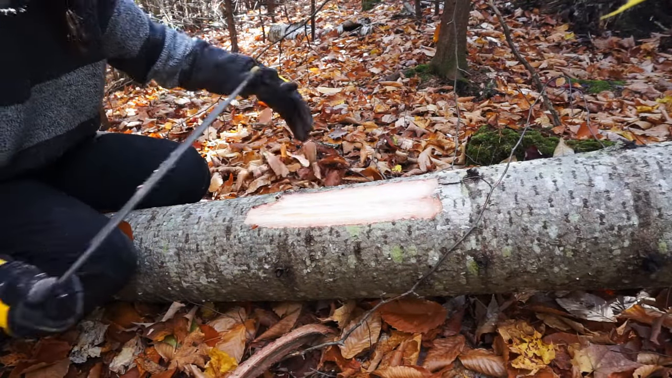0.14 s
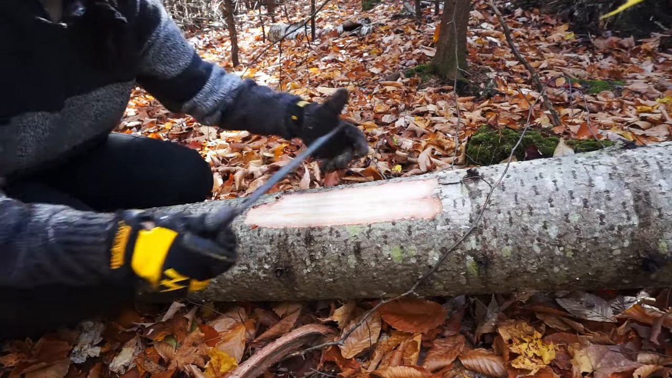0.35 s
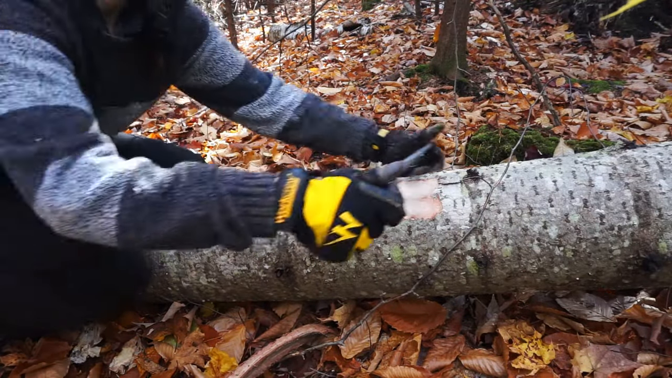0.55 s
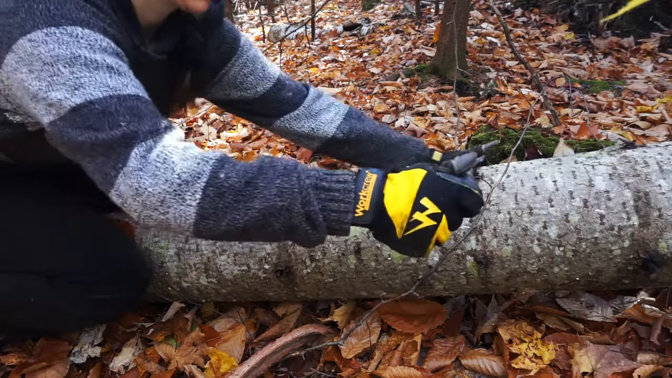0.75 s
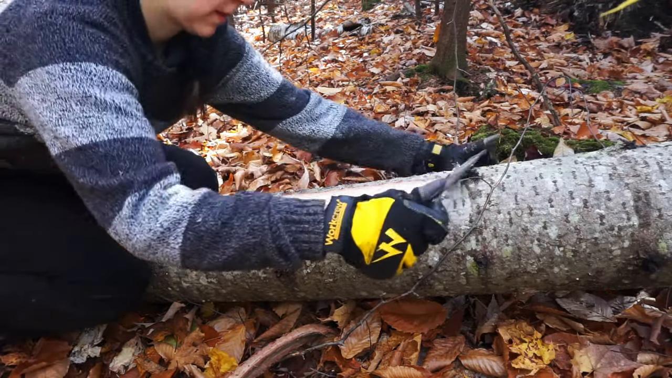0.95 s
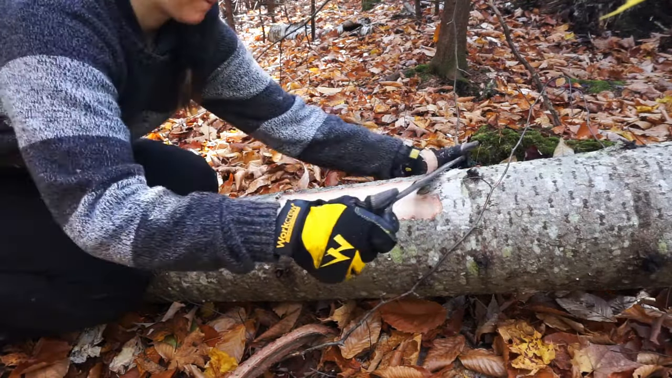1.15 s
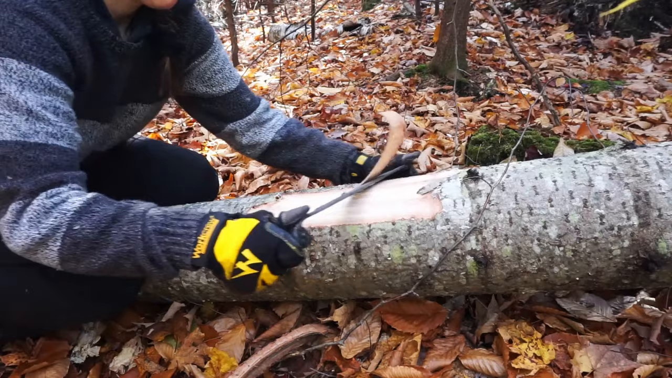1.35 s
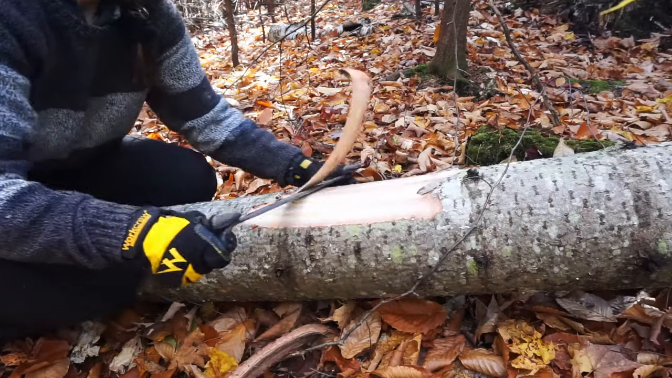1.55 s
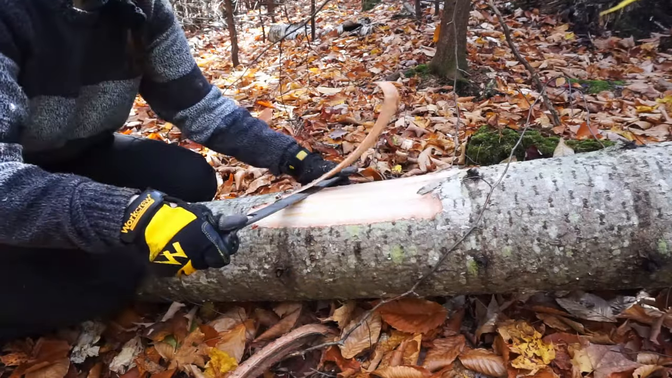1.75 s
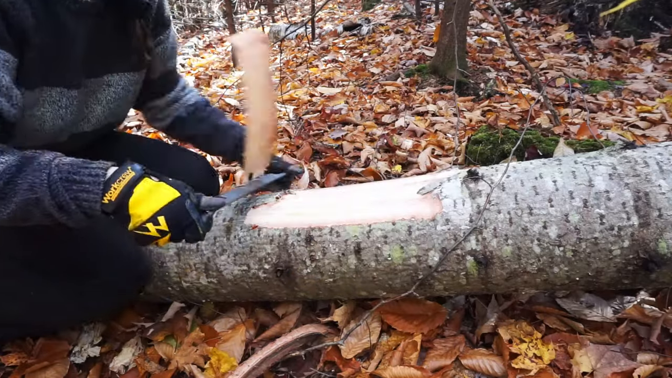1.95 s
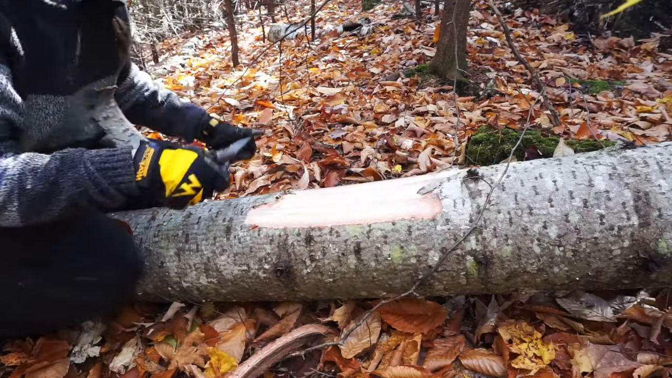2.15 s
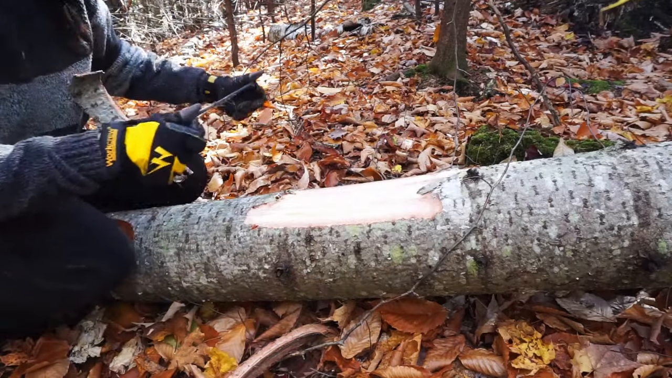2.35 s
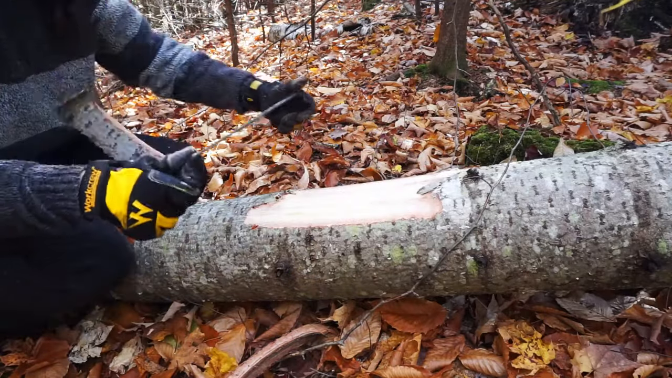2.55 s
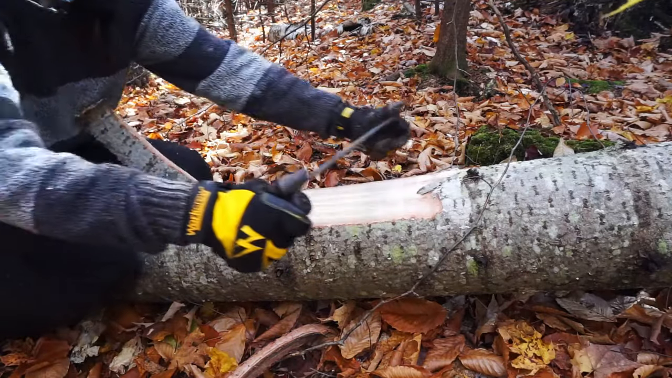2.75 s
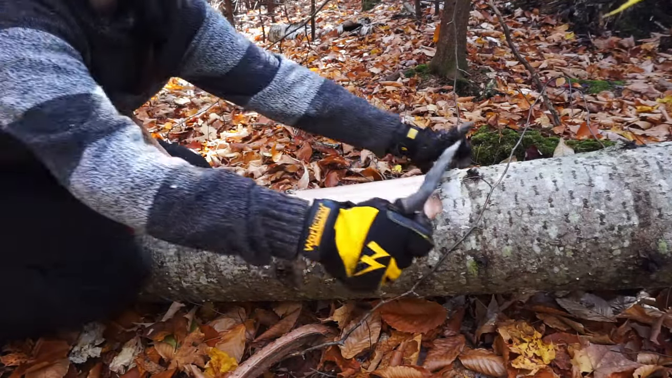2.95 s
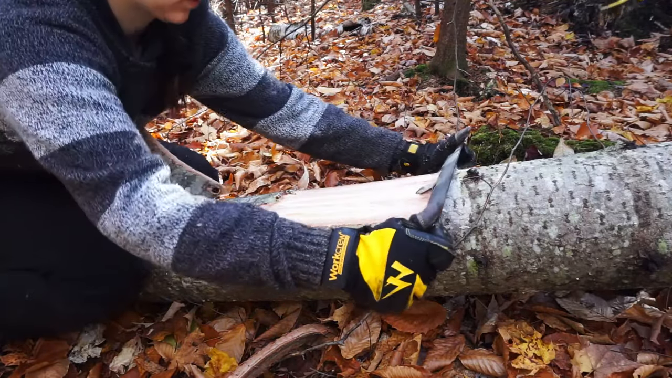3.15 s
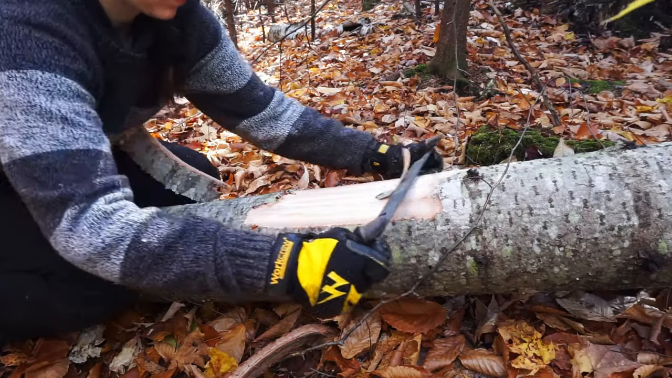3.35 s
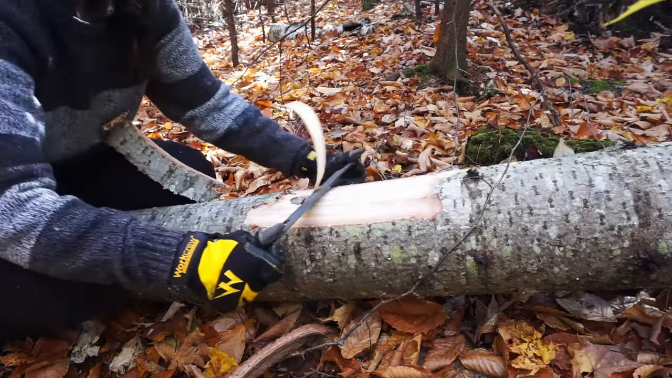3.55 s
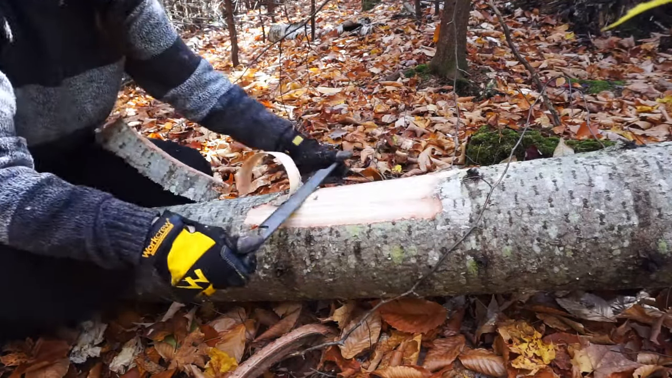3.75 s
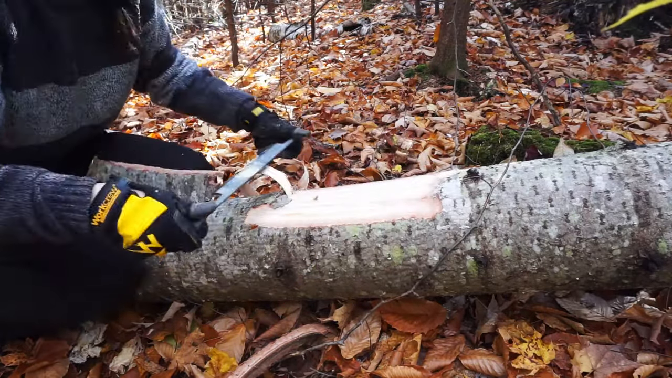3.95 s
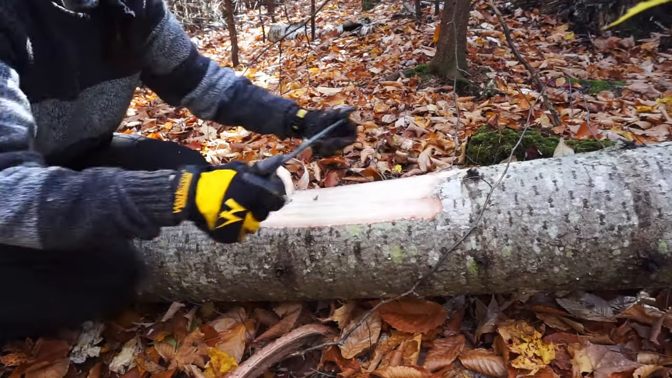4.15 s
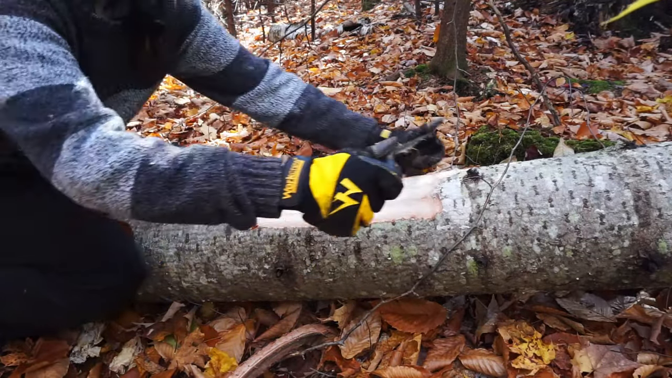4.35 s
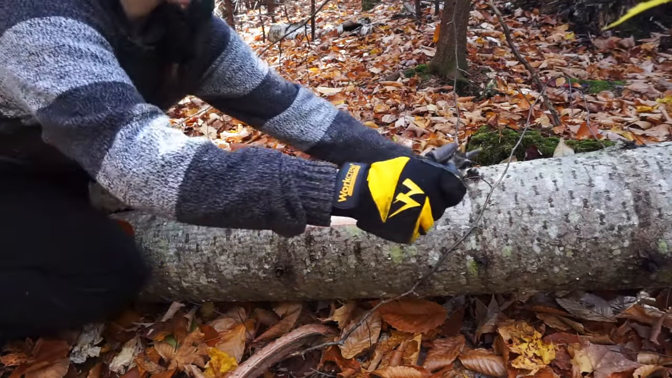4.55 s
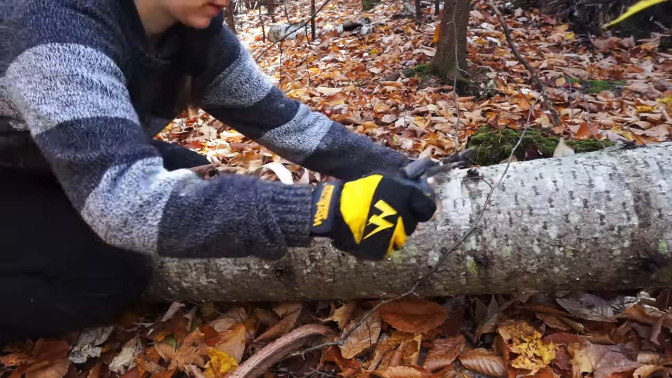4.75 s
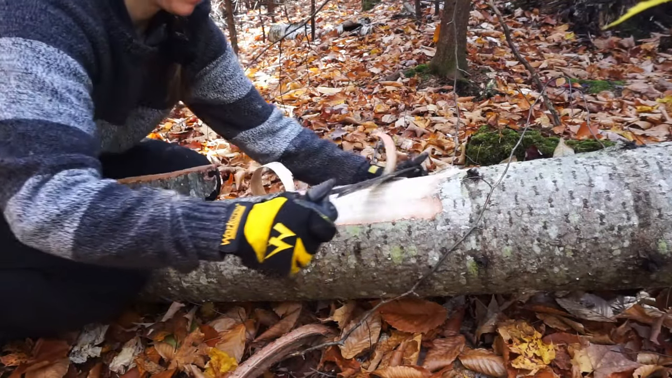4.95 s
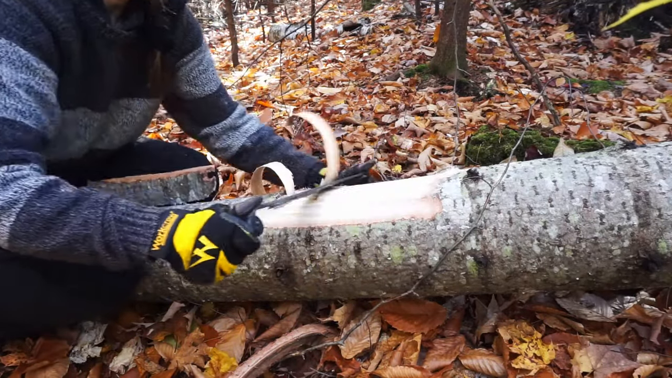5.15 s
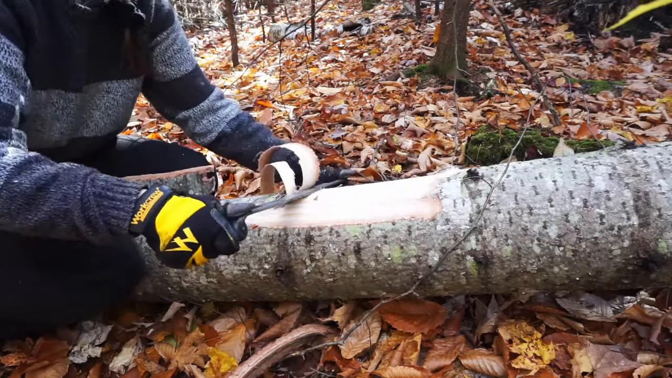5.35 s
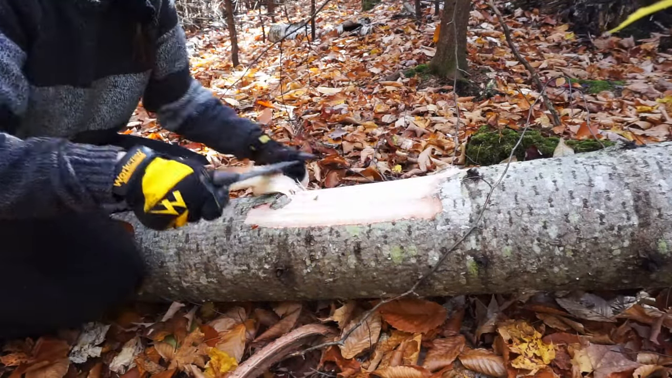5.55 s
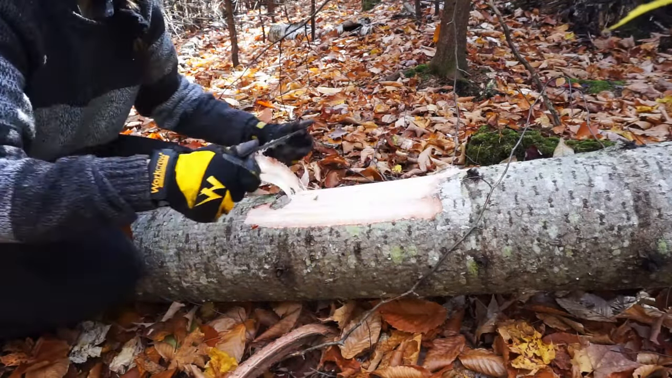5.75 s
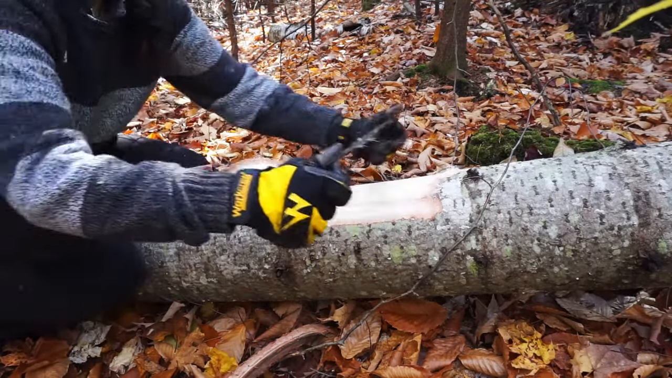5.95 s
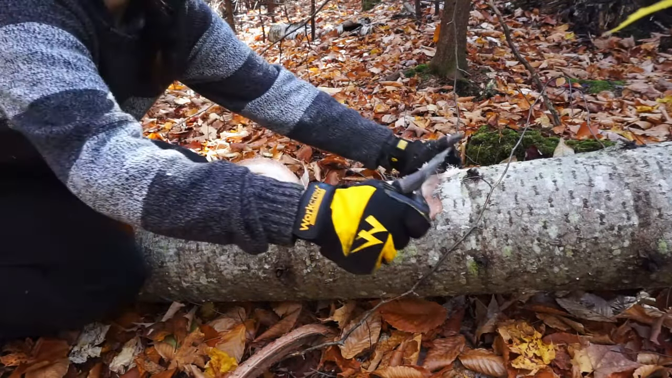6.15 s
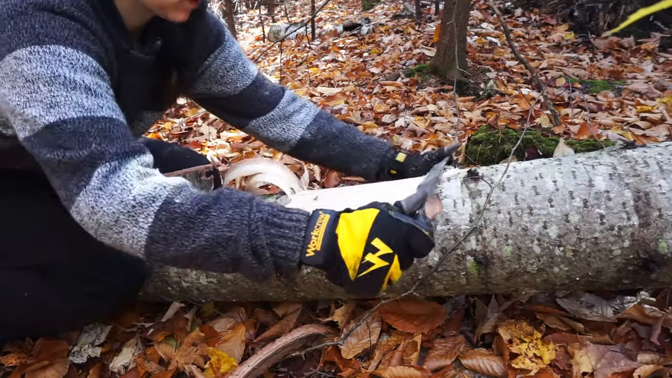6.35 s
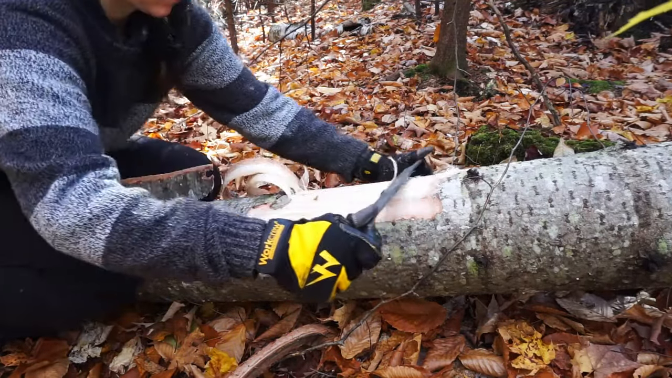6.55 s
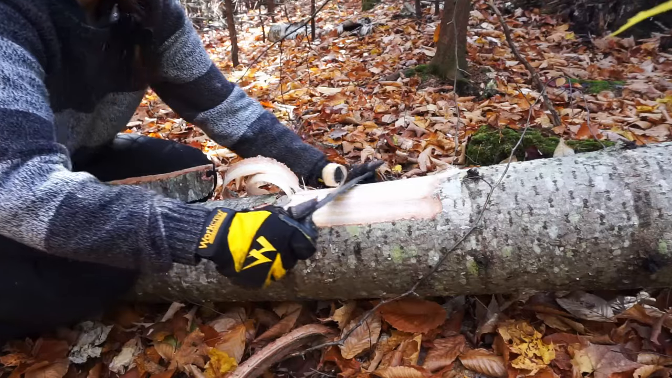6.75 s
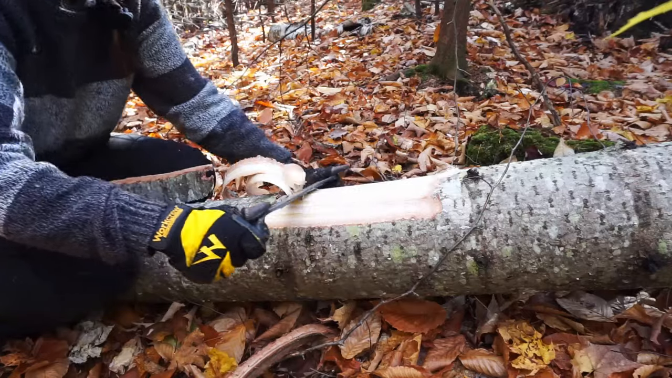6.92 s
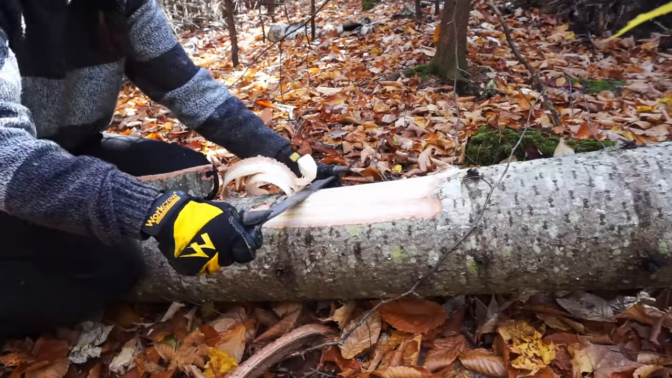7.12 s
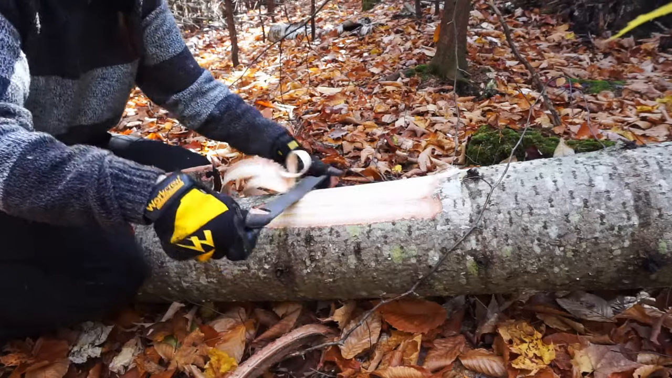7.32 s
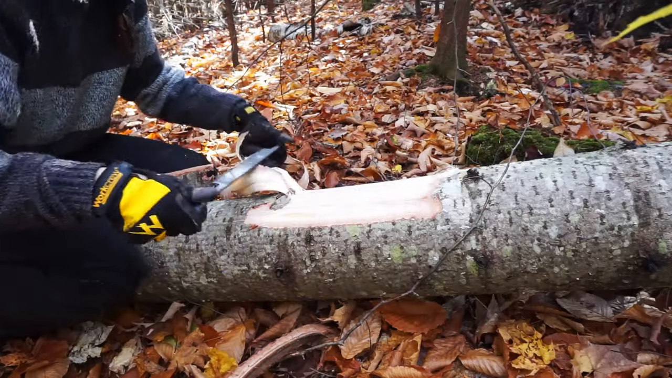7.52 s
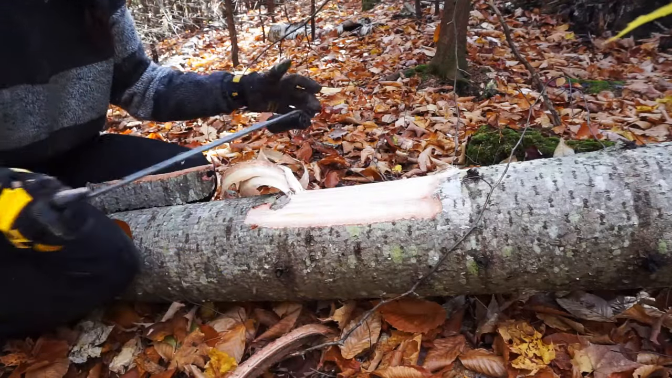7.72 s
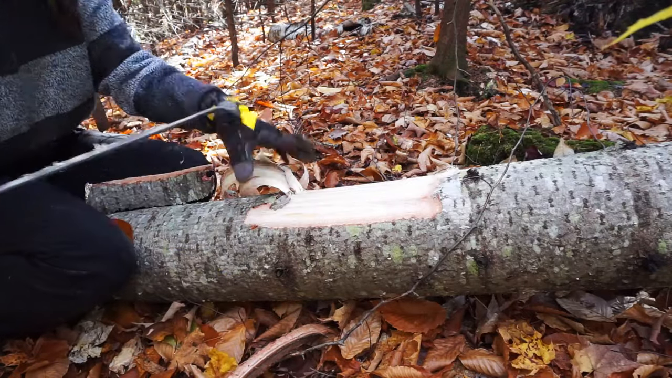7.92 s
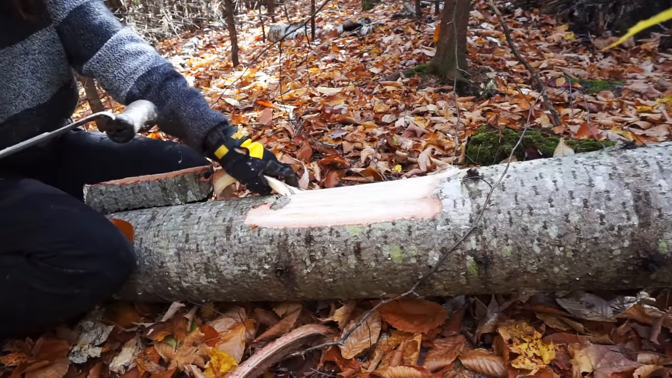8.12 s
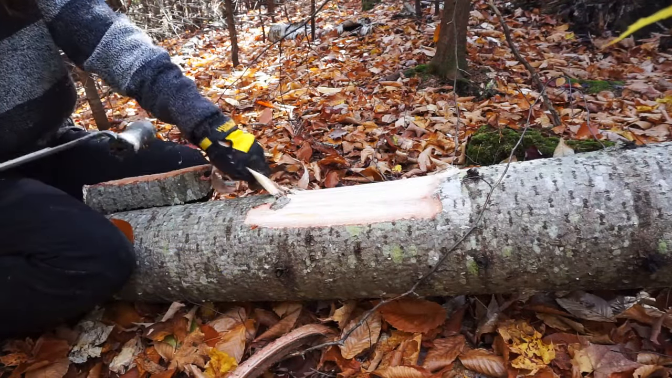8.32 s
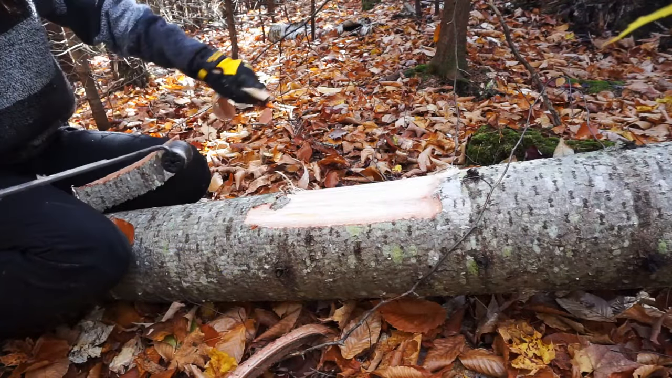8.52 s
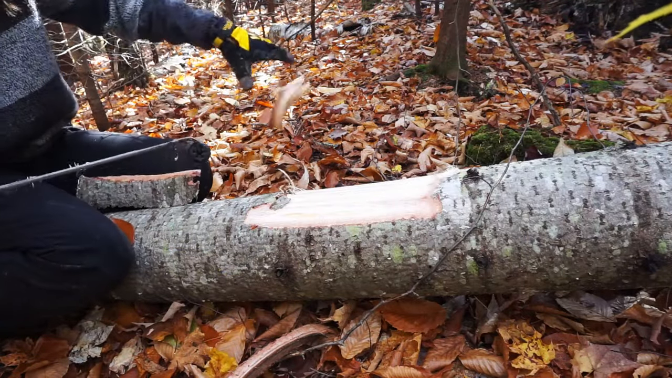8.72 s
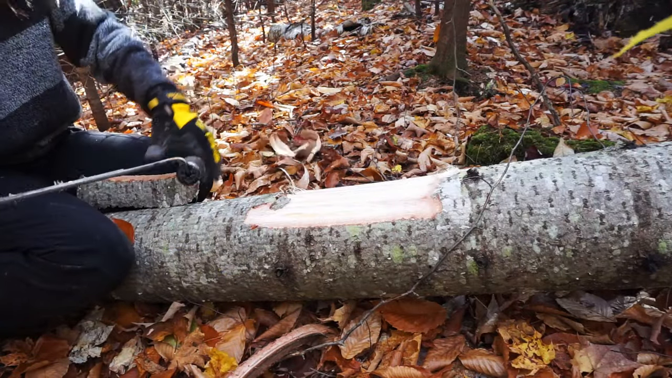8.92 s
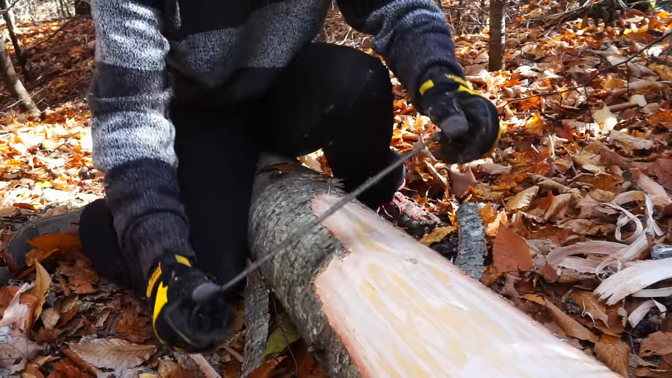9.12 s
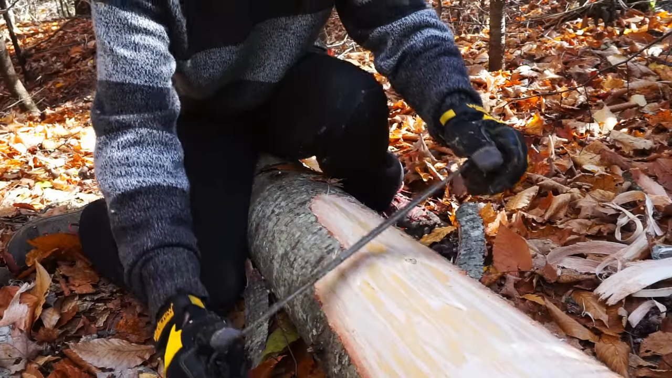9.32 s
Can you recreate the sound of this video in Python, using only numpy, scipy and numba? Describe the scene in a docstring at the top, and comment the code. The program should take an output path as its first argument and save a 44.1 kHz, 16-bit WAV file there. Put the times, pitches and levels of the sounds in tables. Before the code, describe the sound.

Close, dry tearing scrapes of a blade pulled along a log, with snapping fibres, short dull steel rings, rustling leaves and faint forest wind.

```python
"""A drawknife is pulled along a log in a quiet forest, a metre from a small stereo camera.
Far wind (shaped noise), rustling leaves, gloves and strips (dense small cracks), snaps (noise bursts)
and knocks on the log (resonances struck by noise) come first. From 0.92 s to 7.4 s, pull by pull, fibres
tear in dense cracks that ring the blade; the catching edge strikes its modes (decaying sines) from 1.1 s
to 8.4 s. Rustles, snaps and knocks go on past 9 s, where a low rumble joins the wind."""
import sys
import numpy as np
from scipy import signal
from scipy.fft import rfft, irfft, next_fast_len
from scipy.io import wavfile
from scipy.ndimage import uniform_filter1d
from numba import njit

SR = 44100
rng = np.random.default_rng(int(sys.argv[2]) if len(sys.argv) > 2 else 0)


def file_out(sig):
    """Save sig as 16-bit WAV at sys.argv[1]."""
    # one column per channel
    cols = np.atleast_2d(sig).T
    # limit, then scale
    lim = np.clip(cols, -1, 1)
    pcm = np.round(lim * 32767).astype(np.int16)
    wavfile.write(sys.argv[1], SR, pcm)


N = 418068  # length [samples]


def undb(db):
    """Logarithmic level: amplitude ratio of a level in dB."""
    return np.exp(np.asarray(db) * np.log(10) / 20)


def level(x, db=0):
    """Effective value: scale a signal to an rms given in dB."""
    return x * undb(db) / np.sqrt(np.mean(x ** 2))


def colour(x, points):
    """Spectral shaping: weight noise by points (frequency [Hz], level [dB]), then set rms 1."""
    size = next_fast_len(N)
    hz, db = np.transpose(points)
    bins_hz = np.arange(size // 2 + 1) * SR / size
    gain = undb(np.interp(np.log(bins_hz + 1), np.log(hz), db))
    return level(irfft(rfft(x, size) * gain, size)[..., :N])


def ring(x, hz, width_hz):
    """Simple resonance: a band-pass with gain 1 at the centre."""
    return signal.lfilter(*signal.iirpeak(hz, hz / width_hz, fs=SR), x)


def modes(x, table):
    """Modal superposition: a body responds with the sum of its resonances."""
    return sum(undb(db) * ring(x, hz, width_hz) for hz, width_hz, db in table)


def walk(rate, size=32):
    """Slow random modulation: a new level every 1 / rate s, joined smoothly, spread below 1."""
    knots = rng.standard_normal(int(N / SR * rate) + 3)
    places = np.arange(N // size + 1) * size * rate / SR
    coarse = np.interp(places, np.arange(len(knots)), knots)
    smooth = uniform_filter1d(coarse, int(SR / size / rate / 2))
    return np.repeat(smooth, size)[:N]


def pair(alike):
    """Partial coherence: two ports share the fraction `alike` of noise power, turned in phase."""
    shared, left, right = rng.standard_normal((3, N))
    size = next_fast_len(N)
    lead = np.exp(1j * 0.8)  # the right port leads by 0.8 rad
    turned = irfft(rfft(shared, size) * lead, size)[:N]
    return np.sqrt(alike) * np.array([shared, turned]) + np.sqrt(1 - alike) * np.array([left, right])


def sides(pan_db):
    """Interaural level difference: gains of two ports, left minus right in dB."""
    return undb(np.array([pan_db, -pan_db]) / 2)


def crackle(rate, spread_db, tail, patchy_db):
    """Random impulse process: envelope of uneven cracks (rate [1/s], tail [s]) that cluster."""
    happens = rng.random(N) < rate / SR
    size = happens * undb(spread_db * np.minimum(rng.exponential(size=N), 4.5))
    # powers of overlapping cracks add
    power = signal.lfilter([1], [1, -np.exp(-1 / (tail * SR))], size ** 2)
    return np.sqrt(power) * undb(patchy_db * (walk(30) + walk(110)))


def add(out, s, sound):
    """Linear superposition: add a sound that starts at s seconds."""
    i = int(s * SR)
    out[..., i:i + sound.shape[-1]] += sound[..., :N - i]


# colour of the far wind: (frequency [Hz], spectral density level [dB per Hz])
WIND_COLOUR = [(12, -35), (20, -27), (74, -4), (130, -8), (154, -11.5), (310, -14), (337, -15), (1120, -19),
               (1290, -19), (1660, -19.5), (2670, -16), (5850, -23.5), (10800, -24), (16000, -18)]
# low rumble, strongest after 9 s: (time [s], level [dB])
RUMBLE = [(0, -61), (8.95, -63), (9.05, -46), (9.2, -44.5), (9.48, -45)]


def forest():
    """Diffuse field: far wind has the same bass at both ports and unrelated hiss; it swells a little."""
    mid, side = rng.standard_normal((2, N))
    side = signal.sosfilt(signal.butter(3, 230, "high", fs=SR, output="sos"), side)
    wind = colour(np.array([mid + side, mid - side]), WIND_COLOUR)
    wind = wind * sides(0.35)[:, None] * undb(-45.5 + 0.62 * walk(4.5))
    s, db = np.transpose(RUMBLE)
    low = colour(rng.standard_normal(N),
                 [(15, -4), (60, -9), (110, -10), (200, -23), (500, -20), (2000, -58)])
    return wind + low * undb(np.interp(np.arange(N) / SR, s, db))


# the kneeling worker stirs leaves and cloth throughout:
# (time [s], treble level [dB], nominal mids over treble [dB], left minus right [dB])
STIR = [(0, -26, -12.5, 7), (.27, -36.5, -10, 4.5), (.58, -39, -8.5, 11), (.9, -51, -1, 8.5),
        (1.62, -43.5, -7, 6), (1.82, -35, -14.5, 7.5), (2.04, -44, -3, 10), (2.18, -36, -12, 12.5),
        (2.43, -40.5, -10, 9), (2.58, -46.5, -7, 14), (3.0, -49.5, -7, 19.5), (3.7, -49.5, 5.5, 9.5),
        (3.9, -47, 1, 9), (4.15, -57.5, -2, 18.5), (4.7, -55.5, 2, 14.5), (5.3, -50, 0, 7),
        (5.76, -52, -4, 13.5), (6.2, -60, 6, 12), (7.2, -55.5, 5.5, 11.5), (7.36, -37.5, -2, 7),
        (7.5, -47, -8, 8), (7.66, -52, 5, 6.5), (8.0, -58, 3, 14), (8.4, -39, -1.5, 13),
        (8.72, -45.5, -10, 7), (8.8, -45, -7.5, 11), (9.04, -39, 1, 6), (9.2, -35, -4.5, 6.5),
        (9.48, -27, -6, 4.5)]
# single rustles of strip, glove or leaf: (time of peak [s], rise by 20 dB [ms], fall by 20 dB [ms],
# treble level [dB], nominal mids over treble [dB], left minus right [dB]); times held within 4 to 400 ms
RUSTLES = [(.012, 100, 60, -15.5, -14, 6.5), (.327, 8.3, 17, -15, 0, 5.5), (.37, 24, 120, -30.5, -6.5, 4),
           (.482, 37, 150, -39, -13, -1), (.768, 36, 150, -36, -8.5, 4), (1.724, 15, 40, -36, -24.5, 4),
           (2.114, 40, 21, -33.5, -14, 15), (2.41, 52, 60, -34.5, -11, 8), (2.59, 27, 53, -47, -15, 6),
           (3.122, 36, 250, -32, -4.5, 10.5), (3.962, 110, 19, -32.5, -10.5, 11),
           (3.995, 25, 170, -38.5, 0.5, 12.5), (4.525, 15, 80, -46, -2, 15), (4.56, 30, 45, -40.5, -2, 1),
           (5.342, 110, 11, -44.5, 0, 6), (5.404, 43, 30, -35.5, -13, 4), (5.932, 11, 250, -46, -10, 12),
           (6.15, 15, 11, -44, -15, 14), (6.299, 18, 9.9, -39.5, -15, 8), (7.1, 120, 30, -47, -2, 5),
           (7.51, 11, 350, -34.5, -26, 6), (7.626, 320, 31, -27.5, -4.5, 7.5),
           (7.719, 28, 27, -31.5, -4, 4), (7.828, 16, 18, -35.5, -11, 8), (8.031, 8, 330, -32.5, -0.5, 6),
           (8.105, 38, 78, -16.5, -9, 7.5), (8.208, 180, 190, -29, 2.5, 5.5), (8.306, 21, 123, -24, -7, -2),
           (8.55, 28, 170, -34.5, -5, 8.5), (8.653, 34, 40, -33.5, -2, 9), (8.829, 20, 260, -13.5, -16, 5),
           (8.985, 220, 12, -41, -26, -2), (9.294, 40, 39, -36, -17, -1)]


def rustling():
    """Incoherent addition: powers of the steady stir and of swells even in dB give the port gains."""
    t, (s, *columns) = np.arange(N) / SR, np.transpose(STIR)
    db, mids_db, pan_db = (np.interp(t, s, c) for c in columns)
    top = (undb(db) * sides(pan_db)) ** 2
    mids = top * undb(2 * mids_db)
    for s, rise_ms, fall_ms, db, mids_db, pan_db in RUSTLES:
        rise, fall = np.clip([rise_ms, fall_ms], 4, 400) / 1000
        i, j = max(int((s - 2 * rise) * SR), 0), int((s + 2 * fall) * SR)
        late = t[i:j] - s
        swell_db = db - 20 * np.maximum(-late / rise, late / fall)
        power = (undb(swell_db) * sides(pan_db)[:, None]) ** 2
        top[:, i:j] += power
        mids[:, i:j] += power * undb(2 * mids_db)
    return np.sqrt(top), np.sqrt(mids)


# colour of a crack's treble: (frequency [Hz], spectral density level [dB per Hz])
TREBLE = [(4000, -30.5), (6000, -13.5), (8000, -8), (10000, -5), (12500, -1.5), (15000, -6.5), (16500, 0)]
# colour of the mids of leaves and snaps: (frequency [Hz], spectral density level [dB per Hz])
LEAF_MIDS = [(300, -14.5), (800, -6.5), (1400, -6), (2300, -1), (4000, -1.5), (6000, -5), (8000, -10.5)]


def rustles():
    """Crackling noise: in dry leaves, gloves and strips small cracks hiss, larger ones crunch lower."""
    top_gain, mids_gain = rustling()
    ticks = level(crackle(90, 3.0, .0005, 1.5), -5)  # a few stand out alone
    small = level(crackle(2500, 3.0, .001, 1.2))
    large = level(crackle(1500, 2.0, 0.0012, 2.5), 4.1)
    noise = pair(0.45)
    hiss = colour((small + ticks) * noise, TREBLE)
    crunch = colour((small + large + 0.82 * ticks) * noise, LEAF_MIDS)
    return top_gain * hiss + undb(-2.0) * mids_gain * crunch


# the loudest snaps of fibre, twig and leaf: (time [s], relative level [dB], centre [Hz],
# nominal mids over treble [dB], left minus right [dB])
SNAPS = [(0.358, -23, 12100, -28, 5.5), (1.0126, -11, 10800, -23, 2), (1.0266, -13, 10400, -25, 0.0),
         (1.044, -9, 12700, -22, 0.5), (1.0849, -3, 9430, -20, -0.5), (1.1026, -2, 12900, -29, 1),
         (1.1482, -11, 13200, -28, 1.0), (1.2066, -11, 13700, -27, 0.0), (1.246, -3, 11900, -23, -3),
         (1.279, -9, 7070, -23, -1), (1.3274, -7, 11800, -18, 1.0), (1.3902, -7, 12800, -20, 1.5),
         (1.4465, -3.5, 13400, -29, 1.5), (1.4832, -3, 11900, -32, 5), (1.5447, -11, 10100, -29, 6),
         (1.56, -6, 12600, -25, 3.5), (1.6475, -24, 13300, -29, 7.0), (1.726, -12.5, 13700, -33, 5.5),
         (1.7927, -19, 10900, -31, 5.0), (1.8587, -17, 13600, -21, 4.5), (1.8781, -6.5, 13400, -20, 5),
         (1.8951, -11, 15000, -21, 5.0), (1.902, -8, 13500, -21, 10), (1.9252, -13, 11600, -27, 5.0),
         (1.9383, -4, 11300, -26, 7), (2.0006, -19, 6090, -20, 14), (2.1114, -21, 12200, -23, 8.5),
         (2.2513, -22, 8720, -30, 7), (2.3156, -18, 12700, -31, 9), (3.4101, -17, 5180, -26, 1.5),
         (3.6511, -11, 8870, -15, 11), (3.669, -10, 5310, -16, 5), (3.8207, -6.5, 5200, -15, 4),
         (3.8364, -8.5, 8490, -13, 4), (3.8437, -7.5, 5100, -20, 10), (4.5229, -26.5, 8020, -15, 7),
         (4.557, -23, 6790, -20, 2.5), (4.791, -18, 12600, -17, -4), (4.812, -9, 12600, -20, 0.5),
         (4.849, -2, 12700, -20, 1.0), (4.871, -8, 13100, -19, 0.0), (4.9018, -12, 13000, -22, 0.0),
         (4.927, -3, 13700, -27, -3), (4.9493, -5, 11500, -22, 0.0), (5.0302, -9, 11400, -28, 0.0),
         (5.1146, -1.5, 13300, -19, 3), (5.1363, -2, 11700, -16.5, 2.5), (5.1826, -13, 13400, -24.5, 0),
         (5.215, -5.5, 11500, -21, 4), (5.232, -8, 13100, -20, 3.0), (5.2488, -5.5, 11800, -21, 3.0),
         (5.3368, -22, 12200, -18, 4.0), (5.3992, -24, 10700, -21, 3.5), (5.4459, -14.5, 6730, -14, 5),
         (5.465, -8, 11900, -13, 2), (5.47, -4, 12400, -18, 5), (5.4964, -7, 13700, -27, 3.5),
         (5.506, -6, 13500, -25, 5.0), (5.5204, -17, 12200, -13, 6.0), (6.9376, -14, 6570, -25, 9),
         (6.9731, -19, 11000, -21, 3.0), (7.0952, -25, 9040, -22, 6.0), (7.2749, -11, 7410, -20, 10.5),
         (7.2895, -15, 5450, -19, 5.5), (7.3057, -2, 13400, -19, 7), (7.333, -6, 11000, -22, 4),
         (7.511, -23, 9920, -32, 8.5), (7.5544, -10, 11800, -24, 10), (7.5744, -9, 12000, -27, 8.0),
         (7.5906, -4.5, 13600, -21.5, 10), (7.6096, -7, 8840, -20, 8), (7.67, -32, 6980, -13, 1),
         (7.6833, -16.5, 10200, -13.5, 5), (7.7096, -15, 14400, -17, 6.5), (7.7142, -8, 13400, -25, 7),
         (7.8261, -20.5, 11100, -33, 6.0), (8.0277, -25, 11700, -14.5, 6), (8.267, -13, 11400, -22, 5.5),
         (8.296, -16, 11200, -13, 4), (8.3045, -3, 14500, -20, 11), (8.31, -6.5, 6040, -22, 8.0),
         (8.3187, -1, 5030, -20, 5.5), (8.3358, -6, 6950, -16, 7.5), (8.3621, -3.5, 12600, -22.5, 9),
         (8.539, -20, 7810, -21, 9.0), (8.9116, -5.5, 12500, -30, 7), (9.2948, -19, 10300, -25, 4),
         (9.4617, -8, 10500, -21, 10)]


def snaps():
    """Sudden fracture: noise starts at once and dies within milliseconds, the mids more slowly."""
    noise, out, t = pair(0.64), np.zeros((2, N)), np.arange(1024) / SR
    mids = colour(noise, LEAF_MIDS)
    t60 = 0.0032  # treble falls 60 dB [s]
    fall = undb(-60 * t / t60)
    for s, db, hz, mids_db, pan_db in SNAPS:
        i = min(int(s * SR), N - len(t))
        top = ring(fall * noise[:, i:i + len(t)], hz, 1.33 * hz)
        top = signal.lfilter(*signal.butter(2, 0.5 * hz, "high", fs=SR), top)
        # restore the energy lost in filtering
        top *= np.sqrt(np.mean(fall ** 2) / np.mean(top ** 2))
        low = undb(mids_db + 6.5 - 60 * t / (t60 + 0.015)) * mids[:, i:i + len(t)]
        add(out, s, undb(db - 2.0) * (top + low) * sides(pan_db)[:, None])
    return out


# dry clacks of tool and chips on wood:
# (time [s], peak level [dB], centre [Hz], noise falls 60 dB, held within 0.004 to 0.08 [s])
CLACKS = [(.469, -36.5, 900, .02), (.5619, -22.5, 1480, 0.018), (0.5612, -20, 443, 0.022),
          (.772, -36, 1500, 0.022), (1.998, -27, 2040, 0.014), (2.095, -32, 1900, 0.012),
          (2.447, -30, 2800, 0.013), (2.549, -32, 2960, 0.015), (2.7575, -31.5, 1590, 0.021),
          (3.0062, -21, 1390, 0.005), (3.669, -35.5, 2080, 0.018), (3.678, -46.5, 1200, 0.016),
          (3.7602, -23, 1590, 0.019), (4.5243, -18.5, 1390, 0.018), (5.575, -21, 2130, 0.014),
          (5.587, -13.5, 1960, 0.0252), (5.604, -18.5, 1500, 0.019), (7.2132, -26, 2190, 0.013),
          (7.2762, -14.5, 2220, 0.027), (7.5904, -17.5, 1640, 0.023), (8.096, -19.5, 2140, 0.06),
          (8.112, -15, 2140, 0.105), (8.135, -16.5, 2020, 0.096), (8.202, -16, 2270, 0.024),
          (8.249, -14.5, 2270, 0.042), (8.363, -24, 1500, 0.014)]
# dull thuds into the log:
# (time [s], peak level [dB], centre [Hz], push falls 60 dB, held within 0.01 to 0.3 [s])
THUDS = [(.773, -37, 227, 0.23), (1.152, -35.5, 140, .2), (2.085, -41.5, 417, 0.034),
         (3.057, -37, 215, 0.26), (3.684, -28, 327, 0.063), (3.851, -40.5, 374, .2),
         (4.565, -36, 220, 0.067), (5.604, -28, 300, 0.03), (6.227, -35, 217, 0.082),
         (7.213, -32, 404, 0.098), (7.2764, -26, 408, 0.17), (7.335, -40, 300, 0.29),
         (7.34, -39.5, 165, 0.21), (9.47, -14.5, 343, 0.072)]
# log modes: (frequency [Hz], width [Hz], level [dB])
LOG = [(130.4, 25, -10.5), (165, 9.1, 1.5), (232, 13.6, 3.5), (300, 16, -0.5), (374, 15, 0), (506, 25, -6)]


def knocks():
    """Impact excitation: a clack is a blow and a noise splinter in a broad band, a thud sounds the log."""
    out, t = np.zeros(N), np.arange(8192) / SR
    splinters = rng.standard_normal((len(CLACKS), len(t)))
    for (s, db, hz, t60), noise in zip(CLACKS, splinters):
        blow = (t == 0) * 5.4
        splinter = noise * undb(-60 * t / np.clip(t60, .004, .08))
        sound = ring(ring(blow + splinter, hz, 0.72 * hz), hz, 4.1 * hz)
        add(out, s, undb(db) * sound / np.abs(sound).max())
    rumbles = rng.standard_normal((len(THUDS), len(t)))
    for (s, db, hz, t60), noise in zip(THUDS, rumbles):
        push = undb(-60 * (t / np.clip(t60, .01, .3)) ** 1.34)
        # the heavy log keeps shaking faintly after the blow
        shaking = undb(-22 - 60 * t / 0.67) * np.cos(np.pi * t / t[-1] / 2)
        force = noise * (push + shaking)
        sound = ring(force, hz, .5 * hz) + undb(1.5) * modes(force, LOG)
        sound = ring(sound, hz, 1.0 * hz)
        add(out, s, undb(db) * sound / np.abs(sound).max())
    return out * sides(4.2)[:, None]


def spells(tables, fade=.004):
    """Gating: columns along time; the first (dB, to gain) is silent between spells that do not touch."""
    t, rows = np.arange(N) / SR, np.vstack(tables)
    on = sum((t >= table[0][0]) * (t <= table[-1][0]) for table in tables) > 0
    db, *rest = (np.interp(t, rows[:, 0], c) for c in rows[:, 1:].T)
    return uniform_filter1d(on * undb(db), int(fade * SR)), *rest


@njit
def moving_resonance(x, hz, width):
    """Time-varying resonance: a state-variable band-pass with moving centre, gain 1 there."""
    y, band, low = np.empty(len(x)), 0., 0.
    for i in range(len(x)):
        g, k = np.tan(np.pi * hz[i] / SR), width / hz[i]
        v = (band + g * (x[i] - low)) / (1 + g * (g + k))
        band, low, y[i] = 2 * v - band, low + 2 * g * v, k * v
    return y


# one table a pull: (time [s], relative tearing treble level [dB],
# coarse tearing mids over treble [dB], nominal blade ring over treble [dB])
STROKES = [
    [(0.92, -57, 3, -1), (0.926, -46.5, -8, -7), (0.996, -34, -4.5, -5), (1.054, -20.5, -8.5, -11),
     (1.074, -35, -2, -4), (1.084, -18, -10, -15), (1.096, -28, -6, -4), (1.102, -20, -11.5, -14),
     (1.126, -35.5, -12, -7), (1.182, -39.5, -7, 0), (1.19, -33, -8, -11)],
    [(1.19, -28, -7, -9), (1.202, -24, -9, -15.5), (1.366, -24.5, -8.5, -10), (1.39, -19, -11.5, -16),
     (1.428, -21.5, -8.5, -10), (1.442, -19.5, -9, -13.5), (1.49, -19, -14.5, -19),
     (1.498, -29, -13.5, -14.5), (1.588, -16.5, -12.5, -22), (1.62, -47, -9, -5)],
    [(1.82, -40, -18, -21.5), (1.892, -28.5, -10.5, -20), (1.944, -26.5, -15.5, -17), (1.96, -50, -12, -9),
     (1.99, -41, -5, -11)],
    [(3.2, -37, -7, -17), (3.224, -42, -2, -11), (3.252, -36, -3.5, -4.5), (3.296, -29, -2.5, -9),
     (3.364, -39.5, 0, -0.5), (3.522, -27.5, -4, -14.5), (3.632, -38.5, 0, -15), (3.656, -30.5, -8, -31),
     (3.674, -26, 1.5, -12.5), (3.69, -57, 9, 1)],
    [(3.78, -59, -7, 6), (3.806, -45, 2.5, 10), (3.846, -27.5, -5, -4), (3.856, -41, -4, 3),
     (3.88, -51, -9, -9)],
    [(4.74, -64, 8, 14), (4.752, -44.5, -1, 5.5), (4.788, -32.5, -6, -6), (4.858, -28, -7, -1),
     (4.986, -27.5, -6, -8), (5.034, -20, -10.5, -18), (5.04, -28, -7, -11), (5.064, -25.5, -8, -7),
     (5.108, -18.5, -7, -20), (5.248, -22.5, -10.5, -15.5), (5.27, -55, 0, 10)],
    [(5.42, -47, -8, -13), (5.45, -32, -10, -4), (5.46, -38, 6, 8), (5.47, -25.5, -11, -11),
     (5.55, -40, 2, -11), (5.594, -36, 1, -5), (5.64, -51, 3, -8)],
    [(6.35, -68, 6, 6), (6.398, -53, 0.5, 4), (6.496, -47.5, 1.5, 0), (6.554, -37.5, -5, -13),
     (6.602, -39.5, -2, -1), (6.65, -31.5, -11.5, -24), (6.718, -38.5, -8, -13), (6.944, -30, -9, -26),
     (6.966, -38, -6, -7), (6.974, -29.5, -8, -17), (6.99, -53, 0, 7)],
    [(7.276, -22.5, -2, 1.5), (7.3, -45, -3, 18), (7.306, -23, -7, -6), (7.36, -47, -4, -9)],
]
# colour of the tearing mids: (frequency [Hz], spectral density level [dB per Hz])
TEAR_MIDS = [(150, -32), (400, -10.5), (1200, -6.5), (2000, -3.5), (4000, -5.5), (6000, -12.5), (8000, -11)]
# blade modes: (frequency [Hz], nominal width [Hz], relative level [dB])
BLADE = [(428, 35, -12), (840, 60, 0), (1780, 120, -10), (2190, 90, -6), (3900, 110, -6), (4190, 80, -11),
         (5200, 90, -8)]
# the main blade mode moves as the pull bends the steel, often climbing, then sinking:
# (time [s], frequency [Hz])
BENDING = [(.92, 776), (1.36, 850), (1.6, 807), (3.2, 855), (3.69, 832), (4.74, 754), (4.95, 815),
           (5.13, 836), (5.27, 824), (6.35, 767), (6.6, 834), (6.81, 870), (6.99, 810), (7.2, 827)]
# each strip starts at the far end and the blade travels left: (time of start [s])
STRIP_STARTS = [0, .92, 3.2, 4.74, 6.35]


def strokes():
    """Forced vibration: tearing fibres crackle, and jolts in the same pulls shake blade and log."""
    pull, mids_db, ring_db = spells(STROKES)
    t, starts = np.arange(N) / SR, np.array(STRIP_STARTS)
    since_start = t - starts[np.searchsorted(starts, t, "right") - 1]
    pan_db = -0.3 + 4 * since_start  # left minus right; the blade travels 4 dB per s
    # now and then a thicker fibre breaks
    thick = level(crackle(45, 2.7, .0004, 0.65), -9.5)
    fine = level(crackle(5000, 1.1, 0.0004, 1.12)) + thick
    noise = pair(0.66)
    coarse = (level(fine) + 0.65) * noise
    # the upper blade modes come and go as the edge meets the wood at other places; the wood damps them
    upper = sum(undb(db + 7.3 * walk(14)) * ring(coarse, hz, 0.93 * width_hz)
                for hz, width_hz, db in BLADE[2:])
    # they sound best while the main mode rings strongly
    upper = level(upper, -4.5) * undb(.4 * np.clip(ring_db + 8, -15, 5))
    mids = colour(coarse, TEAR_MIDS) + upper
    tear = colour(fine * noise, TREBLE) + undb(mids_db) * mids

    jolts = crackle(1500, 2.1, 0.0017, 1.2) * pair(0.95)
    s, hz = np.transpose(BENDING)
    hz, width_hz = np.interp(t, s, hz), BLADE[1][1]
    main = np.array([moving_resonance(moving_resonance(port, hz, 1.18 * width_hz), hz, 4.0 * width_hz)
                     for port in jolts])
    lowest = level(modes(jolts, BLADE[:1]), -13.5)
    log = level(modes(jolts, LOG), -15.0)
    steel = level(main, 0.4) + lowest + log
    return undb(1.26) * pull * (tear * sides(pan_db) + steel * undb(ring_db) * sides(0.12 * pan_db))


# the edge catches and the blade rings: (time [s], relative level [dB], relative upper modes level [dB])
CATCHES = [(1.085, -21, 9), (3.672, -33, 13), (3.7595, -18, -22.5), (3.8217, -17, 10), (3.837, -22, 6),
           (3.8442, -21.5, 8), (5.4466, -27, 1.5), (5.4717, -22, 13.5), (7.2135, -14.5, -21),
           (7.2758, -16, -9), (7.2912, -18, -6), (7.308, -17.5, 4), (7.3347, -37, 0), (8.3055, -30, -6),
           (8.363, -22, 5)]


def catches():
    """Free vibration: each catch is a blow on the blade; a harder bite sounds more of the upper modes."""
    t = np.arange(8192) / SR
    rings = [undb(db) * np.exp(-np.pi * .8 * width_hz * t) * np.sin(2 * np.pi * hz * t)
             for hz, width_hz, db in BLADE]
    # the handles split the main mode into a close pair
    twin = 0.093 * np.exp(-np.pi * 60 * t) * np.sin(2 * np.pi * 905 * t)
    low, upper = sum(rings[:2]) + twin, sum(rings[2:])
    out = np.zeros(N)
    for s, db, upper_db in CATCHES:
        add(out, s, undb(db - 7.0) * (low + undb(upper_db - 3.0) * upper))
    return out * sides(2.1)[:, None]


def scene():
    """Superposition and reverberation: near sounds, their faint short tail, and the far forest."""
    wind = forest()
    near = rustles() + snaps() + knocks() + strokes() + catches()
    # ground and trunks return the tail, from 3 ms on, falling 60 dB in 0.1 s
    t = np.arange(6000) / SR
    tail = rng.standard_normal((2, len(t))) * undb(-52 - 60 * t / .1) * (t > .003)
    return near + signal.fftconvolve(near, tail, axes=1)[:, :N] + wind


def record(dry):
    """Band limitation: the camera cuts the top with a steep low-pass at 15750 Hz."""
    return signal.sosfilt(signal.ellip(10, .2, 60, 15750, fs=SR, output="sos"), dry)


dry = scene()
out = record(dry)
file_out(out)
```